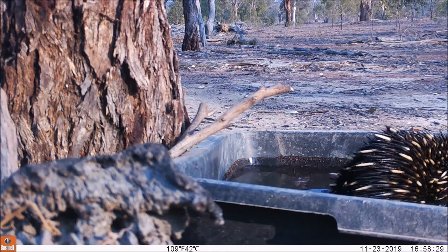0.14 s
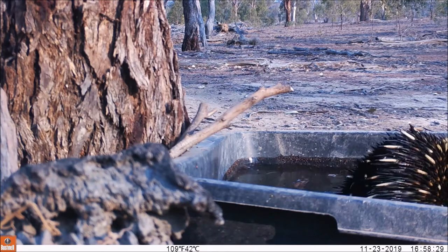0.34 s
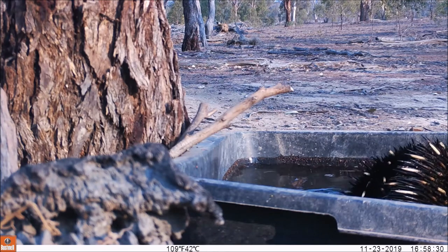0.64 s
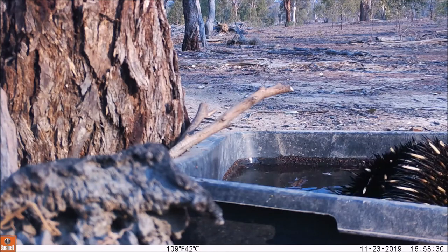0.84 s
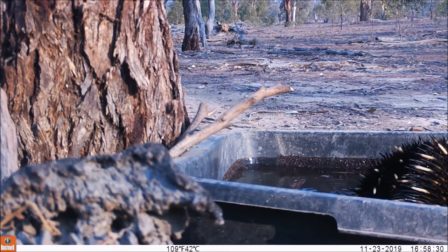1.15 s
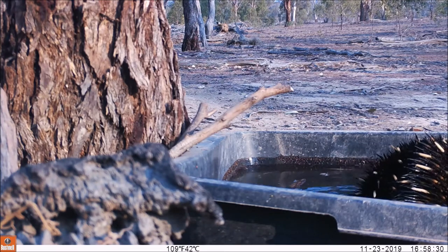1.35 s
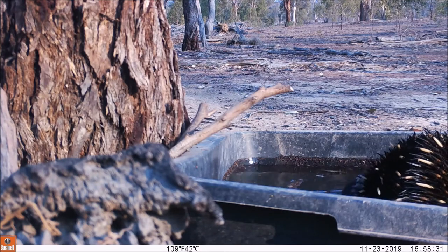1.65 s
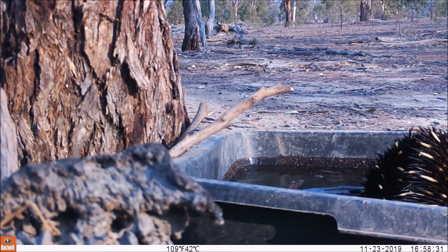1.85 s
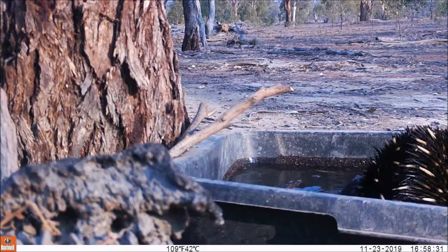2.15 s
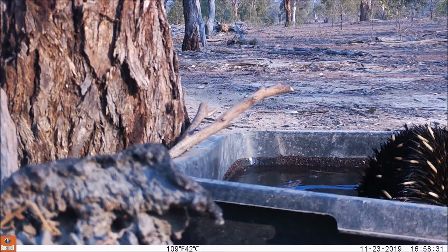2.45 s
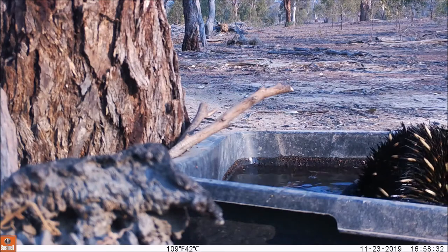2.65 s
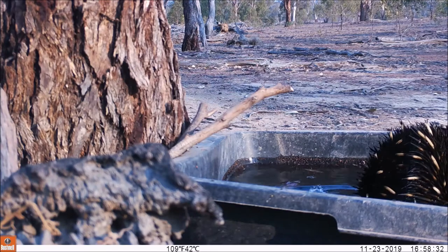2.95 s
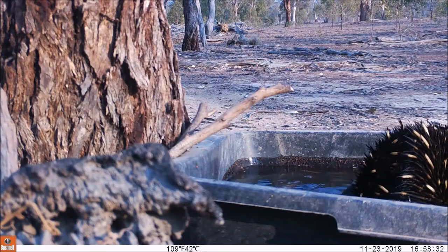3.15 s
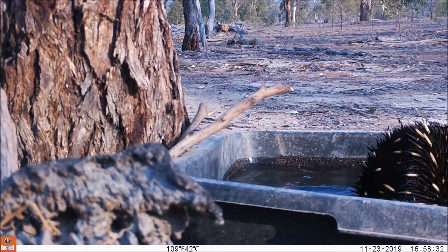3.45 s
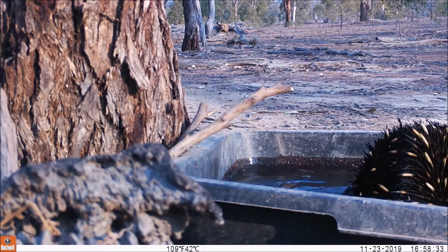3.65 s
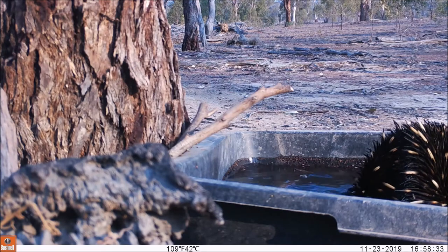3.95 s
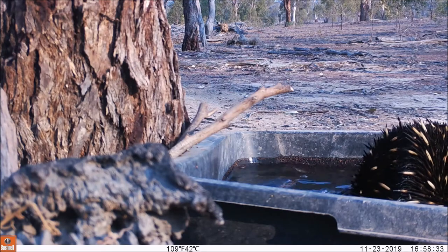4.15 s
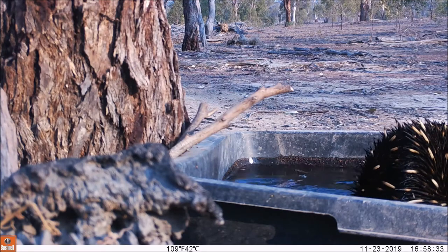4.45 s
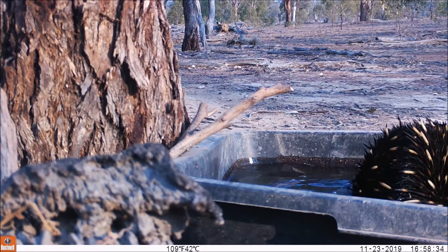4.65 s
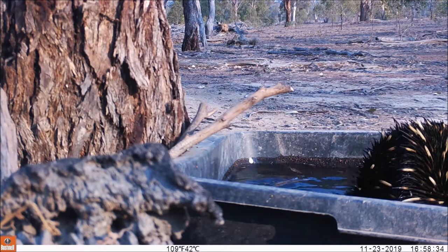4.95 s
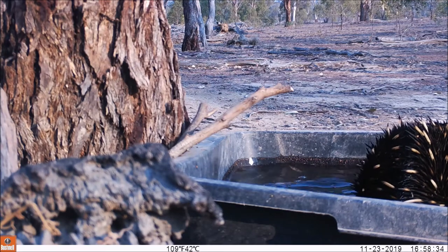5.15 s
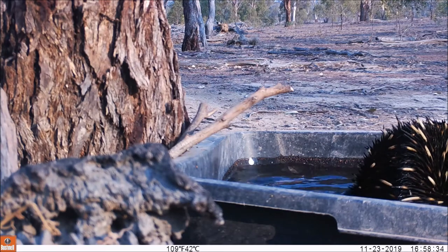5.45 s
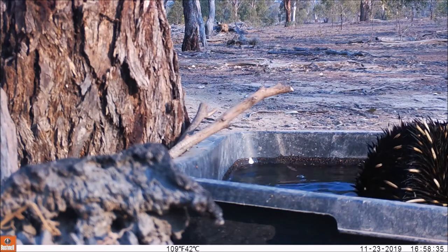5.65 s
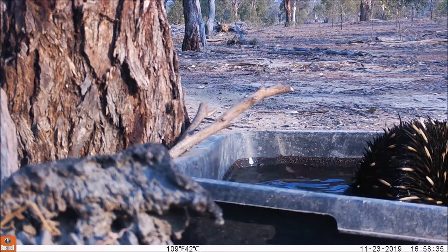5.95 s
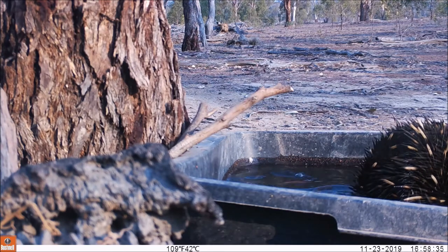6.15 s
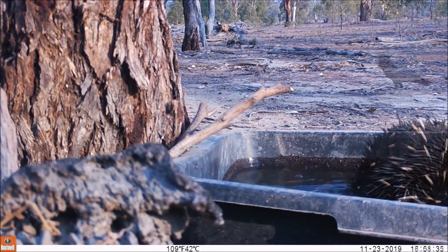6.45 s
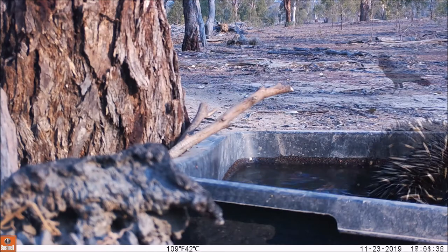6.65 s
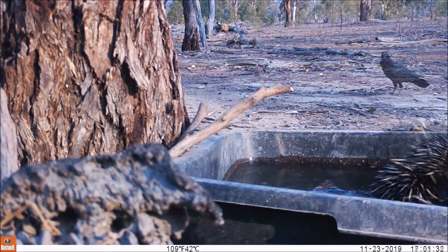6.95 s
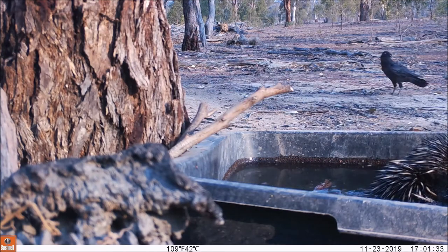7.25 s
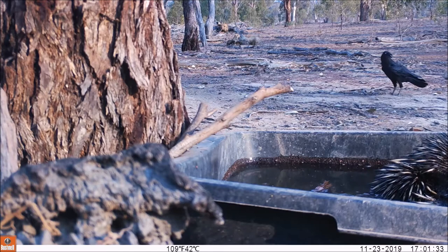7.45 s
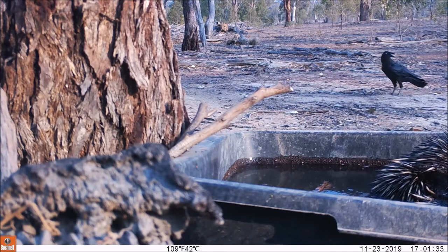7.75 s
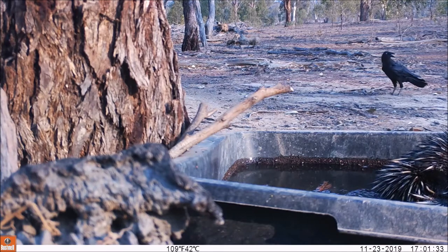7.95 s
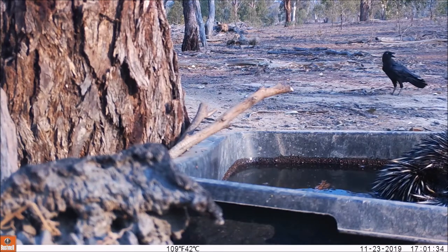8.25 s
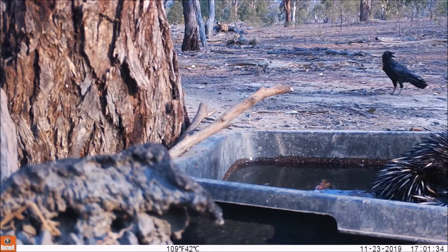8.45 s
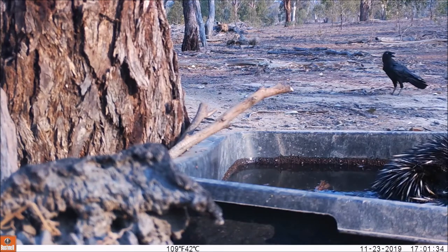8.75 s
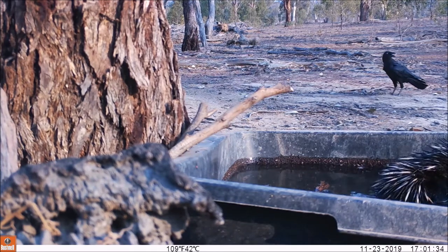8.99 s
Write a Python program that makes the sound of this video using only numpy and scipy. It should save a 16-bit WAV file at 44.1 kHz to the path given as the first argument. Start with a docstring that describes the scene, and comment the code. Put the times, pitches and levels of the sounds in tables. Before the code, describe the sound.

An animal laps and splashes water close by under bird trills and whistles, then wind buffets and two crows caw harshly.

```python
"""Open woodland. Wind rumbles on a single microphone, over its faint steady hiss.
One bird trills, then another joins with a repeated rising whistle. From about 1.7 s a small animal
laps and splashes in a water trough close by, and near 5 s a third bird calls far off.
Around 6 s the wind starts to buffet hard. As the lapping ends, two crows take turns in five caws,
and the trees send back a short echo."""
import sys
import numpy as np
from scipy import signal
from scipy.fft import rfft, irfft, next_fast_len
from scipy.io import wavfile
from scipy.ndimage import uniform_filter1d

SR = 44100
rng = np.random.default_rng(int(sys.argv[2]) if len(sys.argv) > 2 else 0)


def master(y):
    """Save y as 16-bit WAV."""
    cut = np.clip(np.atleast_2d(y).T, -1, 1)
    pcm = np.round(cut * 32767)  # scale
    wavfile.write(sys.argv[1], SR, pcm.astype(np.int16))


N = 402191
TIME = np.arange(N) / SR


def from_db(db):
    """Gain for a level in dB."""
    return 10 ** (np.asarray(db) / 20)


def rms_one(x):
    """Normalise to unit rms."""
    return x / np.sqrt(np.mean(x ** 2) + 1e-20)


def at_hz(points, hz):
    """Read an EQ curve on a log-frequency axis."""
    curve_hz, curve_db = np.transpose(points)
    return np.interp(np.log(hz), np.log(curve_hz), curve_db)


def drift(rate_hz, size=N):
    """Random modulator: noise twice through a one-pole low-pass, at unit rms."""
    r = np.exp(-2 * np.pi * rate_hz / SR)
    noise = rng.standard_normal(size + SR // 4)
    return rms_one(signal.lfilter([1], [1, -2 * r, r * r], noise)[SR // 4:])


def coloured(spectrum):
    """Steady noise through an EQ curve, at unit rms."""
    size = next_fast_len(N)
    gain = from_db(at_hz(spectrum, np.fft.rfftfreq(size, 1 / SR) + 1))
    return rms_one(irfft(rfft(rng.standard_normal(size)) * gain, size)[:N])


def resonance(x, hz, width_hz, passes=1):
    """Two-pole band-pass with unity peak gain; more passes steepen it."""
    r = np.exp(-np.pi * width_hz / SR)
    gain = (1 - r * r) / 2
    for _ in range(passes):
        x = signal.lfilter([gain, 0, -gain], [1, -2 * r * np.cos(2 * np.pi * hz / SR), r * r], x)
    return x


# The wind's fader ride. Each row: time in seconds, level in dB.
WIND_LEVEL = [(0, -65.5), (2.2, -66.5), (2.26, -48), (2.6, -39.5), (2.89, -50.5), (2.99, -61.5), (4.3, -62),
              (5.9, -65.5), (6.18, -30), (6.34, -39.5), (6.53, -48.5), (7.12, -49.5), (7.4, -38),
              (7.7, -29), (7.78, -41), (8.0, -32.5), (8.4, -38.5), (8.49, -50.5), (8.93, -66), (9.1, -46.5)]
# The rumble's EQ. Each row: frequency in Hz, level in dB.
RUMBLE_EQ = [(12, -68), (20, 16.5), (120, 0.5), (382, -45), (650, -64), (1100, -120)]
# Hard hits of wind. Each row: time in seconds, peak level in dB.
BUFFETS = [(6.94, -31), (7.545, -21), (7.651, -18.5), (7.695, -25), (7.928, -22), (8.017, -28.5),
           (8.212, -26)]


def wind():
    """Air hitting the microphone makes a lumpy rumble; hard buffets reach higher in frequency."""
    rise_db_per_s, fall_db_per_s = 595, 594
    level_db = np.interp(TIME, *np.transpose(WIND_LEVEL))
    rumble = from_db(level_db + 4.36 * drift(20.2)) * coloured(RUMBLE_EQ)
    hard_db = 1.513 * level_db + 8.0   # buffeting grows faster than the rumble
    for hit_s, peak_db in BUFFETS:
        below_db = np.maximum(rise_db_per_s * (hit_s - TIME), fall_db_per_s * (TIME - hit_s))
        hard_db = np.maximum(hard_db, peak_db - below_db)
    band = signal.butter(2, [45, 140], "band", fs=SR, output="sos")
    thumps = rms_one(signal.sosfilt(band, rng.standard_normal(N)))
    return rumble + from_db(hard_db + 2 * drift(20.3)) * thumps


# The hiss's EQ. Each row: frequency in Hz, level in dB.
HISS_EQ = [(59, -20), (100, -0.5), (219, -2.5), (524, -10.5), (2750, -15.5), (5190, -14.5), (6150, -2.5),
           (7450, -17.5), (15000, -19), (16000, -14.5)]
# Its slight swell. Each row: time in seconds, boost in dB.
HISS_SWELL = [(5.9, 0), (7.0, 2.5)]


def hiss(base_db=-59.5):
    """Faint steady microphone hiss with a resonant peak near 6 kHz."""
    swell_db = np.interp(TIME, *np.transpose(HISS_SWELL))
    return from_db(base_db + swell_db + 0.59 * drift(0.72)) * coloured(HISS_EQ)


# The first bird's trills. Each row: start and end in seconds, top pitch in Hz, level in dB.
TRILLS = [(0.241, 0.416, 6980, -57), (0.588, .76, 6700, -60), (0.84, 0.931, 6920, -47.5),
          (1.225, 1.36, 7200, -59.5), (1.601, 1.717, 6920, -50), (2.108, 2.223, 7130, -53.5),
          (2.637, 2.717, 7000, -54), (3.584, 3.7, 6960, -47.5), (4.116, 4.22, 7130, -56),
          (4.449, 4.566, 6700, -46), (5.193, 5.288, 6930, -48), (5.95, 6.136, 6900, -50.5),
          (6.5, 6.69, 6760, -56), (8.84, 9.015, 6680, -56)]


def trills(chips_per_s=58, duty=.6):
    """A bird fires off rows of short chips, each falling in pitch."""
    out = np.zeros(N)
    for start, end, top_hz, level_db in TRILLS:
        on = (TIME >= start) & (TIME < end)
        cycle = (TIME[on] - start) * chips_per_s % 1
        phase = 2 * np.pi * np.cumsum(top_hz - 1410 * cycle ** 2) / SR
        envelope = (cycle < duty) * np.sin(np.pi * cycle / duty) ** 2
        out[on] += from_db(level_db) * envelope * np.sin(phase)
    return out


# The second bird's runs. Each row: start, end and note spacing in seconds, top pitch and rise in Hz,
# hold on the low pitch in seconds, opening and closing level in dB.
WHISTLES = [(.82, 2.1, .113, 3500, 250, 0, -73, -75), (3.432, 6.0, .1131, 3370, 950, 0, -56, -63.5),
            (6.07, 6.8, .295, 3350, 700, .025, -64, -61)]


def whistles(slide_s=.011):
    """Each note slides up quickly and holds near its top; air and leaves make it flutter."""
    out = np.zeros(N)
    waver = 1 + .012 * drift(1.5) + .011 * drift(60)
    for start, end, period, top_hz, rise_hz, low_s, first_db, last_db in WHISTLES:
        on = (TIME >= start) & (TIME < end)
        age = (TIME[on] - start) % period
        pitch = top_hz * waver[on] - rise_hz * np.exp(-np.maximum(age - low_s, 0) / slide_s)
        phase = 2 * np.pi * np.cumsum(pitch) / SR
        envelope = np.clip(np.minimum(age / (.013 - low_s / 2.5), (.1 - age) / .05), 0, 1)
        out[on] += from_db(np.linspace(first_db, last_db, len(age))) * envelope * np.sin(phase)
    return out * from_db(3.5 * drift(60))


# Tongue slaps. Each row: start in seconds, level before filters and gain in dB, time to fall 60 dB
# in seconds, send to the midrange body in dB.
LAPS = [(1.652, -41, 0.03, -26), (1.845, -36.5, 0.032, -41), (1.943, -39, 0.04, -20),
        (2.087, -37.5, 0.044, -22), (2.29, -33, 0.07, -31), (2.4083, -37, 0.1, -20),
        (2.4908, -40, 0.051, -5), (2.576, -34, 0.063, -27), (2.595, -30.5, 0.023, -40),
        (2.765, -35.5, 0.024, -26), (2.807, -40, 0.023, -22), (2.841, -25.5, 0.021, -52),
        (2.94, -35.5, 0.084, -46), (3.0056, -38.5, 0.022, -13), (3.017, -42, 0.057, 0),
        (3.114, -36.5, 0.075, -17.5), (3.291, -41, 0.036, -20), (3.3278, -37.5, 0.097, -18),
        (3.363, -29.5, 0.024, -25), (3.447, -31, 0.075, -49), (3.476, -39, 0.027, -47),
        (3.526, -44, 0.039, -1.5), (3.642, -38, 0.039, -15), (3.6618, -29.5, 0.018, -16.5),
        (3.7925, -35.5, 0.025, -42), (4.0178, -28.5, 0.049, -46), (4.095, -42.5, 0.045, -2),
        (4.1912, -33, 0.094, -19), (4.341, -36, 0.053, -26), (4.4563, -33.5, 0.017, -41),
        (4.486, -33, 0.03, -42), (4.515, -29.5, 0.034, -53), (4.5899, -26, 0.021, -18),
        (4.719, -32.5, 0.05, -18), (4.9325, -29, 0.057, -46), (5.071, -30, 0.077, -21),
        (5.156, -41.5, 0.033, 0), (5.2726, -33, 0.097, -13), (5.56, -19.5, 0.019, -43),
        (5.638, -27.5, 0.04, -19), (5.8514, -31, 0.065, -17.5), (6.068, -38.5, 0.075, -15.5),
        (6.153, -19.5, 0.022, -28), (6.203, -25, 0.071, -52), (6.438, -34.5, 0.054, -20),
        (6.7, -28, 0.022, -55)]
# The splash's bands. Each row: centre in Hz, width in Hz, relative gain in dB.
SPLASH_BANDS = [(4230, 14000, -21), (5360, 1510, 1.5), (6140, 780, 3), (8620, 1640, -2.5),
                (10800, 28000, -43)]


def laps(crackles_per_s=35):
    """A tongue slaps water in grainy bursts, each with its own colour; long ones swell more slowly."""
    bands = len(SPLASH_BANDS)
    spray, body, rings = np.zeros((bands, N)), np.zeros(N), np.zeros(N)
    age = np.arange(SR // 6) / SR
    for start, level_db, t60, body_db in LAPS:
        attack = np.minimum(age / (0.002 + 2.39 * t60 ** 2), 1)
        droplets = from_db(level_db - 27.5 - 60 * age / 0.21)   # water falling back
        envelope = from_db(level_db - 60 * age / t60) * attack + droplets
        burst = envelope * rng.standard_normal(len(age))
        burst = burst * from_db([4.5 * drift(300, len(age)) for _ in SPLASH_BANDS])   # grain per band
        burst *= np.linalg.norm(envelope) / np.linalg.norm(burst, axis=1, keepdims=True)
        span = slice(round(start * SR), round(start * SR) + len(age))
        spray[:, span] += burst * from_db(3 * rng.standard_normal((bands, 1)))
        body[span] += burst[0] * from_db(body_db)
        rings[span] += resonance(burst[1], rng.uniform(4200, 9500), 600)   # a small hollow rings
    lapping = (TIME > LAPS[0][0]) & (TIME < LAPS[-1][0])
    clumps = lapping * from_db(7 * drift(6))
    sizes = from_db(-47.5 + 4.5 * np.minimum(rng.exponential(size=spray.shape), 2.5))
    crackle = (rng.random(spray.shape) < crackles_per_s * clumps / SR) * sizes
    splash = sum(from_db(db) * resonance(row, hz, width, passes=2)
                 for row, (hz, width, db) in zip(spray + crackle + 1e-18, SPLASH_BANDS))
    body = resonance(body + 1e-18, 1980, 4000, passes=2)
    return from_db(8) * splash + from_db(9) * rings + from_db(14) * body


# Short rising blips: water plops. # Each row: start in seconds, level in dB, nominal pitch in Hz, time to fall
# 60 dB in seconds.
BLIPS = [(2.432, -50.5, 2180, .03), (2.487, -52, 2180, .04), (2.975, -47, 3240, 0.023),
         (3.066, -45, 3930, 0.023), (3.527, -40, 648, 0.14), (3.615, -52, 1870, .03),
         (4.096, -45.5, 1150, 0.058), (4.134, -40, 2500, 0.034), (4.594, -51, 700, 0.1),
         (4.612, -49.5, 1095, 0.076), (4.718, -53.5, 755, .07), (5.179, -47, 850, 0.07),
         (5.716, -50, 708, 0.17), (5.93, -42, 1404, 0.087), (6.289, -43, 2100, 0.11)]


def blips(rise_per_s=7.3):
    """Each blip rings unevenly, starting flat and gliding up through its nominal pitch."""
    out, age = np.zeros(N), np.arange(SR // 8) / SR
    gate = np.clip(np.minimum(age / 0.003, (.05 - age) / 0.008), 0, 1)
    for start, level_db, hz, t60 in BLIPS:
        pitch = hz * (.9 + 0.056 * drift(63, len(age)) + rise_per_s * age)
        envelope = gate * from_db(level_db - 60 * age / t60 + 4.5 * drift(110, len(age)))
        at = round(start * SR)
        out[at:at + len(age)] += envelope * np.sin(2 * np.pi * np.cumsum(pitch) / SR)
    return out


# The third bird's timbre. Each row: harmonic number, relative level in dB.
FAR_HARMONICS = [(3, 1), (4, 3), (5, -2), (6, -1)]


def far_call(start_s=4.75, end_s=5.55, glide_hz=(485, 455), level_db=-75):
    """A far bird's drawn-out call: wavering harmonics swell and fade as the pitch sinks."""
    out, on = np.zeros(N), (TIME >= start_s) & (TIME < end_s)
    size = on.sum()
    pitch = np.linspace(*glide_hz, size) * (1 + .016 * drift(30, size))
    phase = 2 * np.pi * np.cumsum(pitch) / SR
    voice = sum(from_db(db + 5 * drift(55, size)) * np.sin(k * phase) for k, db in FAR_HARMONICS)
    out[on] = from_db(level_db) * signal.windows.tukey(size, .6) * voice
    return out


def caw_shape(age, bird, aim_hz, lead_s, climb_s, length_s, droop_db):
    """Level in dB and pitch in Hz: a slack creak jumps up at age 0, sags ever faster and is cut off."""
    slack_hz, sag_power = [294, 288][bird], [2.6, 1.7][bird]
    sag_hz, creak_hz_per_s, cut_db_per_s = 70.3, 2100, 900
    after = np.maximum(age, 0)
    slack, progress = np.exp(-after / climb_s), after / length_s
    pitch = aim_hz - (aim_hz - slack_hz) * slack - sag_hz * progress ** sag_power
    pitch += creak_hz_per_s * np.minimum(age, 0)   # the lead-in's slow pulses speed up
    level_db = np.interp(age, [-lead_s, 0], [-27, -5]) * slack
    level_db += droop_db * np.minimum(progress, 1) ** 5.8
    level_db -= cut_db_per_s * np.maximum(age - length_s, 0)
    return uniform_filter1d(level_db, 500), uniform_filter1d(np.maximum(pitch, 70), 500)


# Throat and beak EQ. Each row: frequency in Hz, first crow's gain in dB, second crow's gain in dB.
THROAT_EQ = [(400, -23.5, -45), (610, -17, -22), (977, -21, -33.5), (1107, -6, -16.5), (1370, 2.5, 4.5),
             (1906, 4.5, -4.5), (2037, 4, 8), (2436, -13, -18.5), (3040, -20, -24), (3700, -25.5, -3.5),
             (4380, -4.5, -12.5), (4750, -10.5, -2.5), (5440, 4, 0), (6900, -2.5, -11), (7440, -21, -31.5),
             (9640, -24, -33), (11500, -44, -49)]
# Narrow, steady resonances of the head's hollows, in Hz.
NASAL_HZ = [3608, 4940, 5438, 6250]


def crow_voice(pitch, shut, bird, odd_db):
    """Syrinx harmonics through the throat, as low and high bands; slack membranes make them rasp."""
    clear_hz, hoarse_hz = 315, 265   # the voice breaks up between these pitches
    treble_rasp, nasal_db = [.02, .16][bird], [-14.5, -5][bird]
    throat = np.array(THROAT_EQ)[:, [0, 1 + bird]]
    size, low, high = len(pitch), 0, 0
    slack = np.minimum((clear_hz - pitch) / (clear_hz - hoarse_hz), .9 - 2 * shut)
    jitter = (.003 + .15 * shut) * drift(40, size)
    phase = 2 * np.pi * np.cumsum(pitch * (1 + jitter)) / SR
    for k in range(1, 56):
        hz = k * pitch
        least_rasp = .02 + treble_rasp * min(k / 12, 1) ** 2 + .2 * shut
        rasp = np.clip(slack * min(k / 7, 1), least_rasp, .9)
        shaken = np.sqrt(1 - rasp) + np.sqrt(rasp) * drift(88, size)
        # A shut beak pulls the lower resonances down and muffles the top.
        gain_db = at_hz(throat, hz * (1 + .2 * shut * (hz < 2900)))
        gain_db -= 6.5 * np.clip((hz - 1400) / 300, 0, 4) * shut ** 2
        gain_db += odd_db * (k % 2) * (k < 14) + 2.2 * drift(14, size)
        smear = .085 * k * k   # phase offsets soften the pulse
        tone = from_db(gain_db) * shaken * np.cos(k * phase + smear) * (hz < 13000)
        crossover = np.clip((hz - 2900) / 300, 0, 1)
        low, high = low + (1 - crossover) * tone, high + crossover * tone
    nasal = sum(resonance(high, hz, width_hz=104, passes=2) for hz in NASAL_HZ)
    return rms_one(low), rms_one(rms_one(high) + from_db(nasal_db) * rms_one(nasal))


# The caws. Each row: time of the pitch jump in seconds, level in dB, target pitch in Hz, lead-in, climb
# and length after the jump in seconds, droop in dB, crow (0 or 1), gain of the lower odd harmonics
# in dB, opening and closing treble in dB.
CAWS = [(6.858, -30, 362.5, 0.097, 0.014, 0.16, -10, 0, 1, 2.5, 8),
        (7.362, -25.5, 393.3, 0.087, 0.022, 0.14, -1.5, 1, -2.5, -4, -0.5),
        (7.475, -29, 367.8, 0.019, 0.011, 0.15, -8.5, 0, 3, 1, 10),
        (7.99, -26.5, 378, .07, 0.012, .136, -2, 1, -2, -6.5, 2),
        (8.192, -29.5, 364.4, 0.056, 0.013, 0.17, -9.5, 0, 2, 0.5, 8)]
# Reflections off the ground and nearest trunks. Each row: delay in seconds, gain in dB.
NEAR_ECHOES = [(.0043, -14), (.0137, -13), (.0291, -16)]


def crows():
    """Two crows trade caws, the beak opening through each lead-in; near surfaces reflect them."""
    out, cut_s = np.zeros(N), 0.032
    for (jump_s, top_db, aim_hz, lead_s, climb_s, length_s, droop_db,
         bird, odd_db, first_db, last_db) in CAWS:
        span = slice(int((jump_s - lead_s) * SR), int((jump_s + length_s + cut_s) * SR))
        age = TIME[span] - jump_s
        level_db, pitch = caw_shape(age, bird, aim_hz, lead_s, climb_s, length_s, droop_db)
        shut = np.clip(-age / .1, 0, 1)
        low, high = crow_voice(pitch, shut, bird, odd_db)
        treble = from_db(np.linspace(first_db, last_db, len(age)))
        envelope = signal.windows.tukey(len(age), .08) * from_db(top_db + level_db)
        out[span] += envelope * (low + treble * high)
    return out + sum(from_db(db) * np.roll(out, round(delay * SR)) for delay, db in NEAR_ECHOES)


def woodland(x, t60_s=1.015):
    """Trunks scatter the sound into a decaying tail that fades in quickly."""
    age = np.arange(int(1.5 * SR)) / SR
    tail = rng.standard_normal(len(age)) * from_db(-60 * age / t60_s) * np.minimum(age / 0.028, 1)
    tail = signal.lfilter([1], [1, -.45], tail)   # leaves take some treble
    return signal.fftconvolve(x, tail / np.linalg.norm(tail))[:N]


def scene():
    """Birds with their echo, hiss, water, blips and wind; one microphone feeds both channels."""
    deep_birds = whistles() + far_call()   # deep among the trees, so they get extra reverb
    birds = crows() + trills() + deep_birds
    echo = woodland(from_db(-16.5) * birds + from_db(-5) * deep_birds)
    return np.tile(birds + echo + hiss() + laps() + blips() + wind(), (2, 1))


def record(dry, cutoff_hz=16300):
    """A steep low-pass takes off the very top."""
    return signal.sosfilt(signal.cheby2(14, 60, cutoff_hz, fs=SR, output="sos"), dry)


dry = scene()
out = record(dry)
master(out)
```